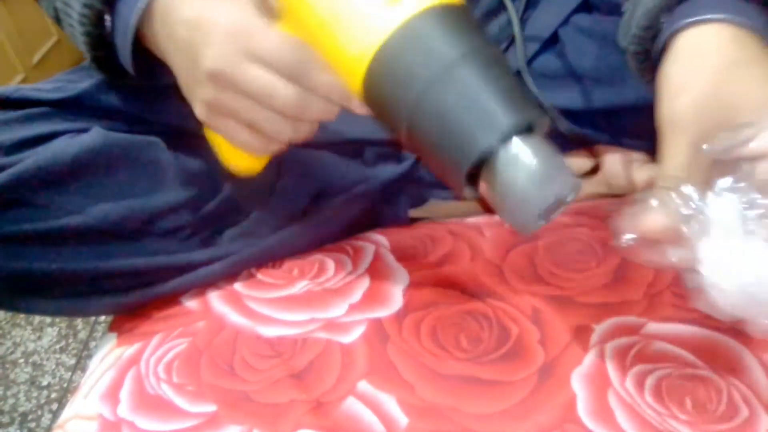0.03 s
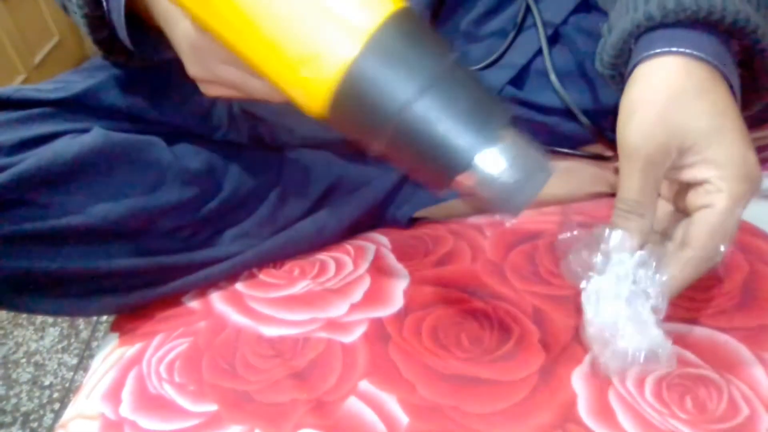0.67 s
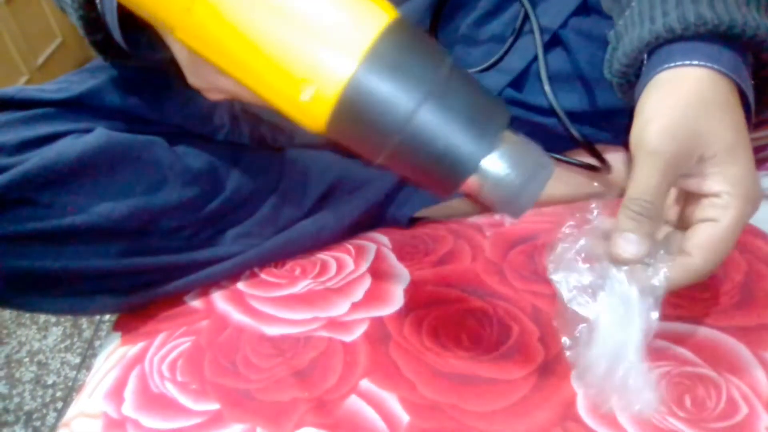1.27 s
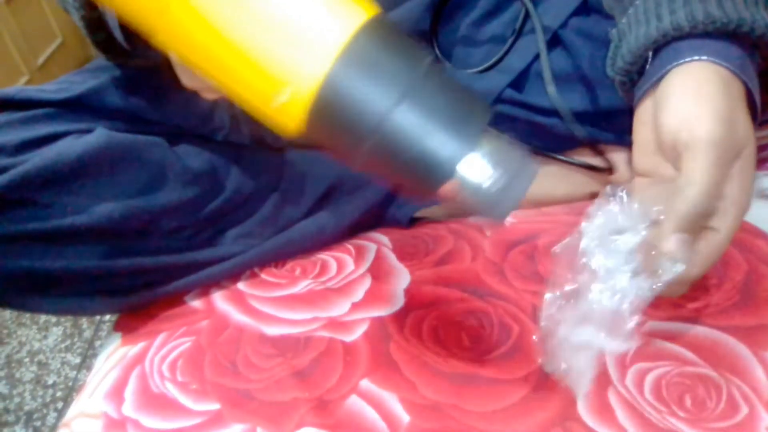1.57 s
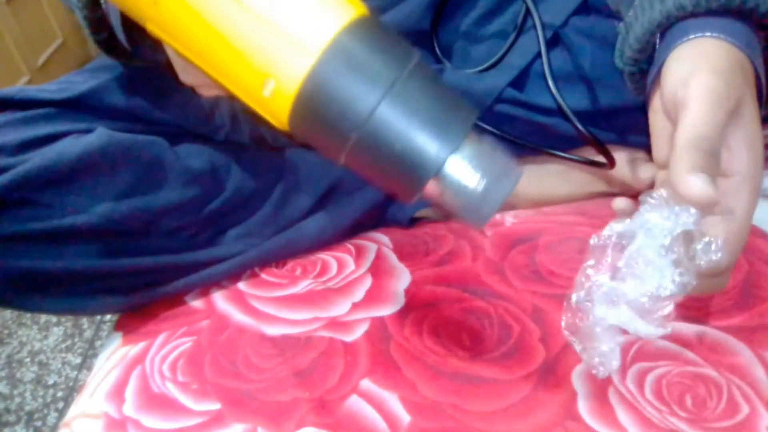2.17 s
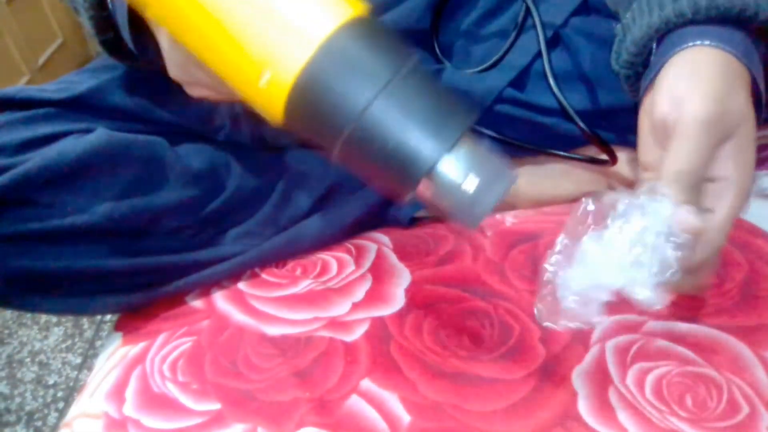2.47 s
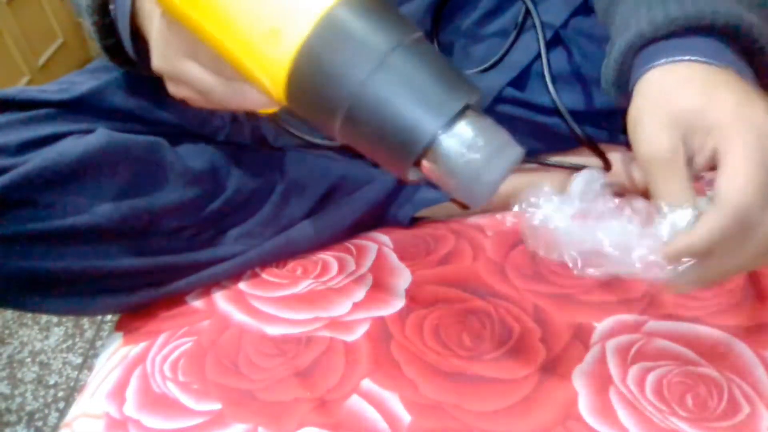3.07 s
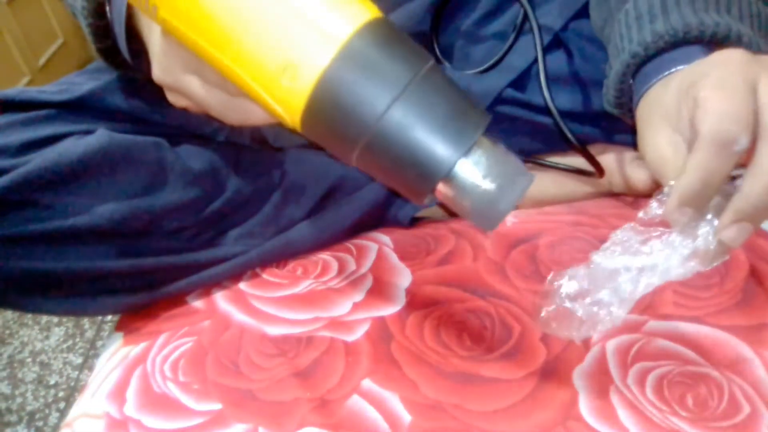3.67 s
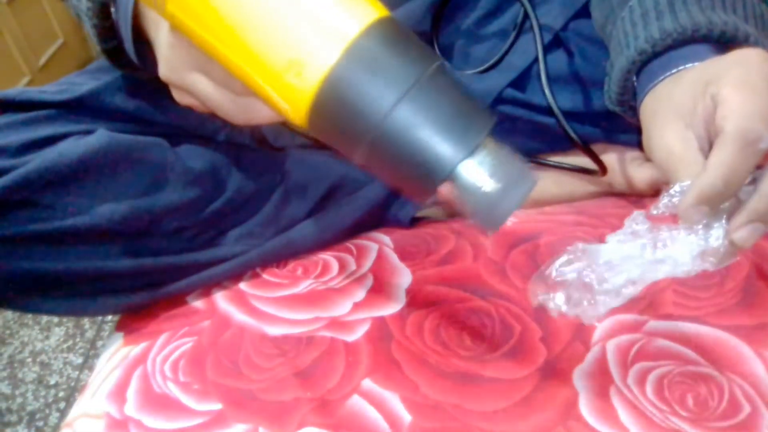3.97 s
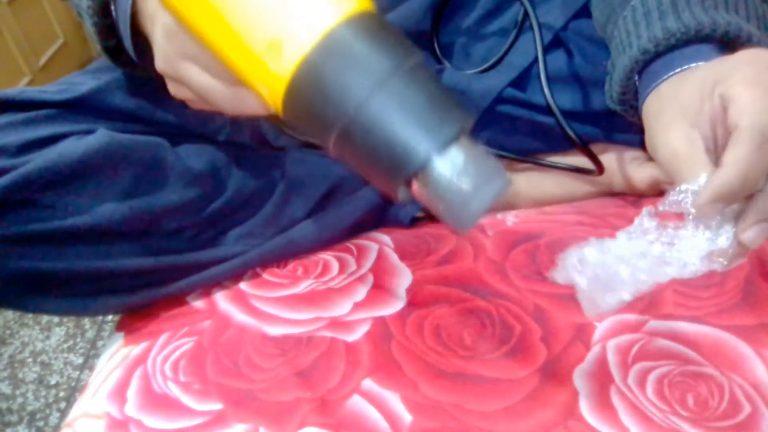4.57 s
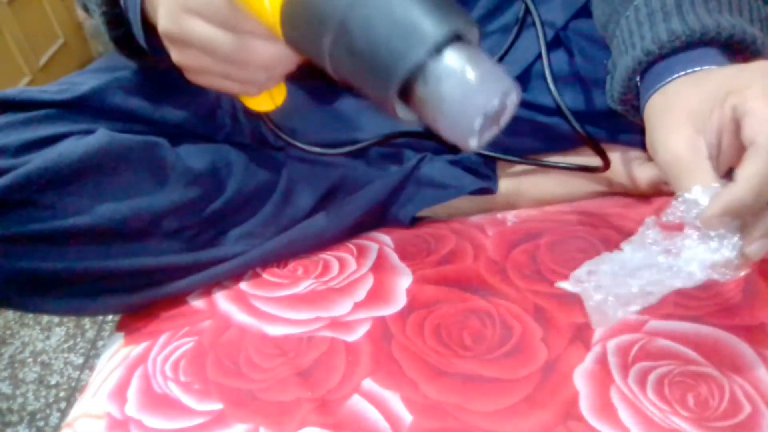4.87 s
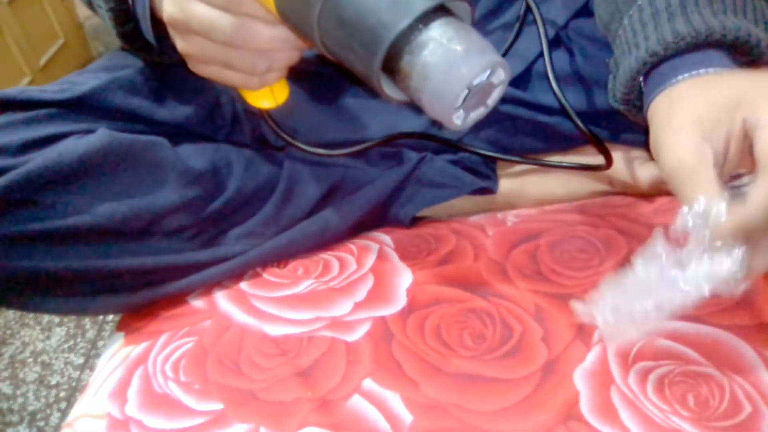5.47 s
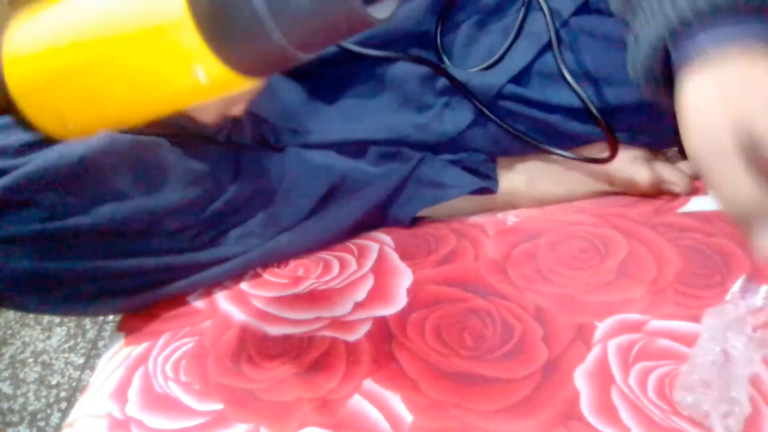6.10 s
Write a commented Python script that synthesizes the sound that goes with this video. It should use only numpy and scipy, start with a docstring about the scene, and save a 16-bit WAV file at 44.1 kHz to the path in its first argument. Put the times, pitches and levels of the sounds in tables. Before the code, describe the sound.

Close to the microphone in a small room, an electric heat gun blows with an even whoosh and a thin whine, while plastic film faintly sizzles and ticks now and then. A sharp click cuts the power, the air dies away and the fan coasts down, rattling lightly. Near the end come a soft hollow bump on the housing, a sleeve rustle and small plastic crinkles.

```python
"""An electric heat gun blows on thin plastic film, close up in a small furnished room.
Fan air rings through the housing and the motor whines through its shell, until the switch
snaps off and the rotor coasts down with a rattle. The film sizzles and snaps in the heat.
Then the grip shifts, a sleeve brushes by and the film crinkles as it is moved away.
Mains hum and a faint hiss lie under it all."""
import sys
import numpy as np
from scipy import signal
from scipy.fft import rfft, irfft, next_fast_len
from scipy.io import wavfile
from scipy.ndimage import map_coordinates

SR = 44100
rng = np.random.default_rng(int(sys.argv[2]) if len(sys.argv) > 2 else 0)


def to_wav(sig):
    """Store sig (one row per channel, or 1-D mono) as 16-bit WAV at the path in sys.argv[1].

    Samples outside -1..1 are clipped; the rate is SR.
    """
    pcm = np.clip(np.atleast_2d(sig), -1, 1) * 32767
    pcm = np.round(pcm).astype(np.int16)
    wavfile.write(sys.argv[1], SR, pcm.T)  # frames by channels


N = 279588

# broad colour of the air stream: freq_hz, gain_db
AIR_COLOUR = [(25, 7), (100, -6), (300, 2), (600, -4.5), (1000, 2), (1700, 1.5), (2700, -1.5), (5400, -0.5),
              (7400, -1), (9000, -7.5), (11300, -13), (15500, -20)]
# resonances of housing and barrel: centre_hz, width_hz, boost_db
HOUSING_PEAKS = [(504, 64, 9), (672.7, 14, 6), (763, 134, 10), (1128, 184, 15.5), (2167, 189, 9),
                 (3070, 327, 7), (3915, 82, 9.5), (4490, 220, 6), (6160, 177, 7), (6640, 190, 6),
                 (7880, 55, 7), (12160, 270, 3)]
# fan tones ahead of the housing, at multiples of the rotor speed: order, level_db
FAN_TONES = [(1, -67), (2, -77), (3, -73), (4, -76), (5, -77), (6, -76), (7, -70), (8, -69), (9, -73),
             (10, -76), (11, -76)]
# commutator orders that stand out of the whine: order, boost_db
STRONG_ORDERS = [(16, 16), (17, 0.5), (19, 6.5), (20, 4.5), (23, 0), (24, 1), (25, 3.5), (30, 5.5),
                 (31, 5.5), (33, 6.5), (35, 5), (40, 5.5), (47, 8.5)]
# colour of the motor's metal shell: freq_hz, gain_db
SHELL_COLOUR = [(1000, -28), (1700, -17), (2200, -10), (2800, -6), (3400, -11), (4050, 1), (4300, -1),
                (4550, 3), (4800, 1), (5100, 4), (6100, -2), (6900, 3), (7400, -4), (9500, -15),
                (15500, -25)]
# lead whines, which land on sharp resonances at full speed: order, flutter_db
LEAD_ORDERS = [(18, 4), (21, 2), (26, 1.5)]
# level rides of the lead whines as the gun is turned about: time_s, low_db, middle_db, high_db
LEAD_RIDES = [(0.0, -63, -66, -64), (0.08, -64, -60.5, -65), (0.35, -62.5, -71, -61),
              (0.66, -64, -57.5, -59), (1.29, -63, -69, -66.5), (2.33, -57, -58.5, -64),
              (2.43, -65, -66, -64), (2.86, -66, -59.5, -68), (2.93, -61, -59.5, -61.5),
              (4.26, -60, -61, -57.5), (4.3, -60, -62, -60)]
# broad colour of the bearing rattle: freq_hz, gain_db
BEARING_COLOUR = [(300, -20), (900, 1), (1600, -8), (3400, -10), (6000, -1), (7500, -4), (9500, -14),
                  (15500, -26)]
# resonances that the rattling rotor rings: centre_hz, width_hz, boost_db
BEARING_PEAKS = [(960, 110, 14), (2160, 80, 6), (2870, 110, 7), (4140, 130, 10), (4560, 160, 7),
                 (5430, 230, 10), (6820, 310, 10.5)]
# the switch lets go and hits its stop: start_s, level_db
SWITCH_HITS = [(4.3925, -32), (4.3943, -35.5), (4.3958, -35)]
# ring of the switch and plastic grip: pitch_hz, level_db, t60_s
GRIP_MODES = [(1090, -9, .06), (2400, -10, .025), (3250, -2, .025), (3580, -5, .025), (4490, -6, .03),
              (5580, -5, .035), (6130, -3, .05), (6670, -6, .04), (7060, -9, .04)]
# soft ring of the hollow housing: pitch_hz, level_db, t60_s
HOLLOW_MODES = [(782, -53.5, 0.51), (1065, -40.5, 0.21), (1190, -73, .3)]
# fits of shrivelling in the hot air: start_s, length_s, level_db
SHRIVEL_FITS = [(0.027, .08, -59), (2.44, .1, -60), (2.595, .05, -56), (3.12, .09, -61)]
# colour of the sizzling film: freq_hz, gain_db
SIZZLE_COLOUR = [(3000, -25), (6000, -8), (8500, -13), (12000, -18.5), (15500, -21)]
# creases buckling in the film: start_s, level_db
FILM_SNAPS = [(0.288, -22.5), (1.6466, -27), (2.46, -27), (2.5305, -26), (2.622, -26), (3.2187, -24),
              (5.6672, -36.5), (5.7443, -35), (5.7718, -28), (5.8573, -40), (5.9025, -41)]
# colour of those snaps: freq_hz, gain_db
SNAP_COLOUR = [(1500, -23), (3500, -10), (6800, 4), (9000, -7), (12000, -23), (15500, -15)]
# moves of the hands: start_s, length_s, sleeve_db, film_db
HAND_MOVES = [(5.2, 0.23, -64, -88), (5.68, 0.095, -60.5, -60.5), (5.82, .04, -64, -67),
              (6.008, 0.024, -82, -66.5)]
# colour of the brushing sleeve: freq_hz, gain_db
SLEEVE_COLOUR = [(200, -18), (550, -17), (780, 4), (1100, 5.5), (1600, -11), (2150, -25), (3000, -14.5),
                 (8000, -30)]
# colour of the handled film: freq_hz, gain_db
CRINKLE_COLOUR = [(1500, 7), (3200, -2), (3900, 5), (5000, 2), (6800, 11.5), (8500, -8), (15500, -60)]
# partials of the mains hum: harmonic, rms_db
HUM_PARTIALS = [(1, -69.5), (3, -60.5), (5, -61), (7, -68.5), (9, -74.5), (13, -86), (15, -79)]
# spectrum of the background hiss: freq_hz, density_db_per_hz
NOISE_FLOOR = [(25, -112), (90, -101), (200, -94.5), (350, -93.5), (600, -101), (1100, -104), (2000, -110),
               (4000, -111), (7300, -111), (7900, -106), (8600, -112), (15500, -114)]

RUN_HZ, OFF_S = 221.8, 4.395  # rotor speed under power; when the power is cut
FRICTION_HZ_PER_S, DRAG_KNEE_HZ = 55, 98  # bearing friction; the speed at which air drag equals it
WHOOSH_DB, HISS_DB, BLADES_DB, WHINE_DB, LEAD_DB = -50.5, -49.5, -0.8, -73, 1.5  # layer faders
# each layer's amplitude follows rotor speed to this power
WHOOSH_POWER, HISS_POWER, BLADES_POWER, WHINE_POWER, LEAD_POWER = 1.96, 2.45, 1.64, 1.2, 5.7


def heat_gun():
    """One rotor drives the air, the fan tones, the whines and the rattle."""
    speed_hz = rotor_speed()
    slowing_db = 20 * np.log10(speed_hz / RUN_HZ)
    # the rotor runs true under power and judders as it coasts
    waver = .0003 * wobble(12) + .0005 * wobble(1.5)
    judder = .016 * (1 - speed_hz / RUN_HZ) * wobble(130)
    turns = np.cumsum(speed_hz * (1 + waver + judder)) / SR
    # the tones outlast the air noise, so they stand out as they fall
    blades = fan_blades(turns) * amp(BLADES_DB + BLADES_POWER * slowing_db)
    # the housing's resonances stay put while the rotor slows
    blower = resonated(air_rush(turns, slowing_db) + blades, AIR_COLOUR, HOUSING_PEAKS)
    motor = motor_whine(turns) * amp(WHINE_DB + WHINE_POWER * slowing_db)
    rattle = bearing_rattle(turns, speed_hz)
    # the leads fade first, slipping off their resonances
    leads = lead_whines(turns) * amp(LEAD_DB + LEAD_POWER * slowing_db)
    return blower + motor + rattle + leads


def rotor_speed():
    """Turns per second: steady under power, then braked by constant friction and speed-squared drag."""
    coast_s = np.maximum(np.arange(N) / SR - OFF_S, 0)
    angle = np.arctan(RUN_HZ / DRAG_KNEE_HZ) - coast_s * FRICTION_HZ_PER_S / DRAG_KNEE_HZ
    return np.maximum(DRAG_KNEE_HZ * np.tan(angle), 1)


def air_rush(turns, slowing_db, crossover_hz=2000, growth_db_per_s=0.22):
    """Turbulence in the fan and barrel; it dies quickly as the rotor slows, the hiss first."""
    low_share = lambda hz: 1 / (1 + (hz / crossover_hz) ** 4)
    whoosh = filtered(rng.standard_normal(N), lambda hz: np.sqrt(low_share(hz)))
    whoosh *= amp(WHOOSH_DB + WHOOSH_POWER * slowing_db)
    hiss = filtered(rng.standard_normal(N), lambda hz: np.sqrt(1 - low_share(hz)))
    hiss *= amp(HISS_DB + HISS_POWER * slowing_db)
    throb = unit(amp(0.24 * np.cos(2 * np.pi * turns)))
    # the level creeps up under power and wavers in the unsteady hand
    powered_s = np.minimum(np.arange(N) / SR, OFF_S)
    sway = amp(growth_db_per_s * powered_s + .45 * wobble(7))
    return sway * (whoosh + hiss * throb)


def fan_blades(turns):
    """The spinning fan sings on the lowest rotor orders."""
    return sum(amp(db) * rotor_tone(turns, round(order), drift_db=1.5, flutter_db=2)
               for order, db in FAN_TONES)


def motor_whine(turns, top_order=96):
    """The commutator's dense comb of orders, each swelling as it slides through a shell resonance."""
    boost_db = {round(order): db for order, db in STRONG_ORDERS}
    leads = [round(order) for order, _ in LEAD_ORDERS]
    comb = np.zeros(N)
    for order in range(len(FAN_TONES) + 1, top_order + 1):
        if order not in leads:
            roll_off = 1 / np.sqrt(1 + (order / 60) ** 4)
            tone = rotor_tone(turns, order, drift_db=2.6, flutter_db=1.8)
            comb += roll_off * amp(boost_db.get(order, 0)) * tone
    return coloured(comb, SHELL_COLOUR)


def lead_whines(turns):
    """Three whines that swell and sink on top, the lowest raspy and the highest purest."""
    times_s, *rides_db = np.transpose(LEAD_RIDES)
    out = np.zeros(N)
    for (order, flutter_db), ride_db in zip(LEAD_ORDERS, rides_db):
        gain = amp(np.interp(np.arange(N) / SR, times_s, ride_db))
        out += gain * unit(rotor_tone(turns, round(order), drift_db=0, flutter_db=flutter_db))
    return out


def rotor_tone(turns, order, drift_db, flutter_db, flutter_hz=70):
    """One multiple of the rotor speed, fluttering in the turbulent air."""
    knots = np.arange(0, N, 128)
    speed = np.gradient(turns[knots])
    # it swells and sinks as the gun moves, faster as its falling pitch crosses the room's standing waves
    travel = 3 * knots / SR + 22 * np.log(speed.max() / speed)
    drift = map_coordinates(rng.standard_normal(150), [travel])
    flutter = map_coordinates(rng.standard_normal(500), [knots * flutter_hz / SR])
    gain = np.interp(np.arange(N), knots, amp(drift_db * drift + flutter_db * flutter))
    return np.sqrt(2) * gain * np.cos(2 * np.pi * (order * turns + rng.random()))


def bearing_rattle(turns, speed_hz, level_db=-65.5, loosen_s=0.17, settle_hz=56.6):
    """Without drive the rotor works loose and ticks on its bearing once a turn, until it is too slow."""
    loose = np.clip((np.arange(N) / SR - OFF_S) / loosen_s, 0, 1) ** 2
    lively = 1 / np.sqrt(1 + (settle_hz / speed_hz) ** 12)
    ticks = rng.standard_normal(N) * amp(-14 * (turns % 1) + 1.5 * wobble(70))
    return amp(level_db) * loose * lively * unit(resonated(ticks, BEARING_COLOUR, BEARING_PEAKS))


def switch_off(crack_t60=0.032, attack_s=.0002):
    """A quick run of contacts, each a dry crack that rings the grip."""
    out, t = np.zeros(N), np.arange(SR // 5) / SR
    crack_band = signal.butter(2, [700, 8000], "bandpass", fs=SR)
    for start_s, db in SWITCH_HITS:
        ring = modal_ring(GRIP_MODES, t)
        crack = signal.lfilter(*crack_band, rng.standard_normal(len(t))) * amp(-60 * t / crack_t60)
        add(out, start_s, amp(db) * (.65 * ring + 1.3 * crack) * (1 - np.exp(-t / attack_s)))
    return out


def grip_shift(start_s=5.22, rise_s=0.033):
    """A soft push on the housing swells into a short hollow ring."""
    out, t = np.zeros(N), np.arange(SR // 2) / SR
    add(out, start_s, modal_ring(HOLLOW_MODES, t) * (1 - np.exp(-t / rise_s)))
    return out


def film_sizzle(steady_db=-70):
    """Hot air shrivels the film in clumps of very fine crackles; they die away with the heat."""
    steady = amp(steady_db) * swell(0, OFF_S, rise_s=.01, t60=.6)
    fits = [amp(db) * swell(s, length, rise_s=.06, t60=.4) for s, length, db in SHRIVEL_FITS]
    envelope = np.linalg.norm([steady, *fits], axis=0)
    crackles = rng.standard_normal(N) * amp(4 * wobble(600) + 1.5 * wobble(40))
    return envelope * unit(coloured(crackles, SIZZLE_COLOUR))


def film_snaps(trim_db=-11.5, t60=0.016):
    """Creases in the film buckle one by one, each a tiny bright burst."""
    out, t = np.zeros(N), np.arange(SR // 40) / SR
    for start_s, db in FILM_SNAPS:
        add(out, start_s, amp(db + trim_db - 60 * t / t60) * rng.standard_normal(len(t)))
    return coloured(out, SNAP_COLOUR)


def handling(rise_s=0.13):
    """With each move the sleeve brushes along while the film gives a spray of tiny crinkles."""
    brush = [amp(db) * swell(s, length, rise_s, t60=0.94) for s, length, db, _ in HAND_MOVES]
    crush = [amp(db) * swell(s, length, rise_s, t60=0.39) for s, length, _, db in HAND_MOVES]
    sleeve = unit(coloured(rng.standard_normal(N), SLEEVE_COLOUR))
    spray = rng.standard_normal(N) * amp(5.4 * wobble(500) + 2.5 * wobble(70))
    crinkles = unit(coloured(spray, CRINKLE_COLOUR))
    return np.max(brush, axis=0) * sleeve + np.max(crush, axis=0) * crinkles


def room(x, t60, wet_db):
    """A short diffuse answer from the soft furnishings and walls."""
    t = np.arange(SR // 2) / SR
    tail = rng.standard_normal(len(t)) * amp(-60 * t / t60) * (1 - np.exp(-t / 0.0035))
    return x + amp(wet_db) * signal.fftconvolve(x, tail / np.linalg.norm(tail))[:N]


def hum_and_hiss(mains_hz=50.2):
    """Odd mains harmonics line up into a soft buzz over a steady bed of hiss."""
    phase = 2 * np.pi * mains_hz * np.arange(N) / SR
    hum = sum(np.sqrt(2) * amp(db) * np.cos(round(harmonic) * phase) for harmonic, db in HUM_PARTIALS)
    return hum + coloured(rng.standard_normal(N) * np.sqrt(SR / 2), NOISE_FLOOR)


def amp(db):
    """Decibels to gain."""
    return 10 ** (np.asarray(db) / 20)


def unit(x):
    """Scale to rms 1."""
    return x / np.sqrt(np.mean(x ** 2) + 1e-20)


def wobble(rate_hz):
    """A smooth random curve with rate_hz knots a second."""
    return map_coordinates(rng.standard_normal(int(N * rate_hz / SR) + 4), [np.arange(N) * rate_hz / SR])


def swell(start_s, length_s, rise_s, t60):
    """An envelope that rises up to its start, holds and dies away."""
    t = np.arange(N) / SR - start_s
    return np.clip(1 + t / rise_s, 0, 1) ** 2 * amp(-60 * np.maximum(t - length_s, 0) / t60)


def modal_ring(modes, t):
    """One decaying sine for each mode, at a random phase."""
    return sum(amp(db - 60 * t / t60) * np.sin(2 * np.pi * (hz * t + rng.random()))
               for hz, db, t60 in modes)


def filtered(x, response):
    """Shape x with a gain that is a function of frequency."""
    size = next_fast_len(N + SR // 2)
    return irfft(rfft(x, size) * response(np.fft.rfftfreq(size, 1 / SR)), size)[:N]


def colour_db(colour, hz):
    """Read an EQ curve of (freq_hz, gain_db) points on a log frequency axis."""
    freq_hz, gain_db = np.transpose(colour)
    return np.interp(np.log(hz + 1), np.log(freq_hz + 1), gain_db)


def coloured(x, colour):
    """Send x through an EQ curve."""
    return filtered(x, lambda hz: amp(colour_db(colour, hz)))


def resonated(x, colour, peaks):
    """Send x through an EQ curve with bell-shaped resonances on top."""
    bells_db = lambda hz: sum(db * np.exp(-.5 * ((hz - centre) / width) ** 2)
                              for centre, width, db in peaks)
    return filtered(x, lambda hz: amp(colour_db(colour, hz) + bells_db(hz)))


def add(track, start_s, sound):
    """Mix a short sound into a track."""
    part = track[round(start_s * SR):][:len(sound)]
    part += sound[:len(part)]


def scene():
    """Gun, film and background in mono, with a touch of room on the clicks."""
    clicks = room(switch_off() + film_snaps(), t60=.1, wet_db=-8)
    return (heat_gun() + clicks + film_sizzle() + grip_shift() + handling() + hum_and_hiss())[None]


def record(dry, low_cut_hz=40, top_hz=15600):
    """The recorder drops the deepest rumble and keeps nothing above its band limit."""
    passband = lambda hz: hz ** 4 / np.sqrt(hz ** 8 + low_cut_hz ** 8) * (hz < top_hz)
    return np.array([filtered(channel, passband) for channel in dry])


dry = scene()
out = record(dry)
to_wav(out)
```